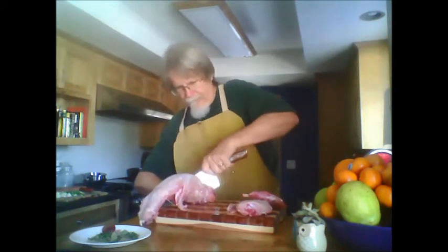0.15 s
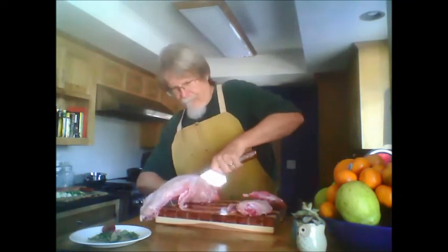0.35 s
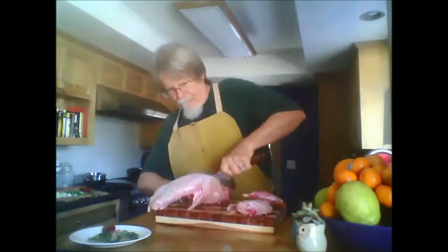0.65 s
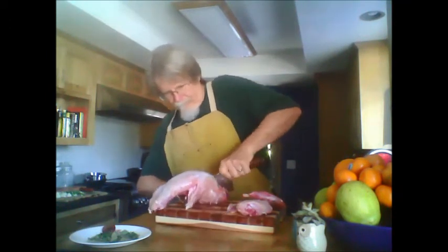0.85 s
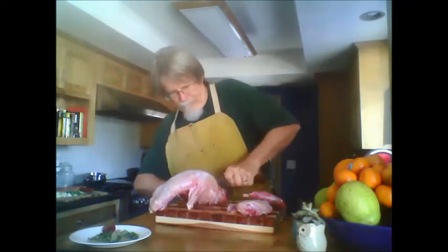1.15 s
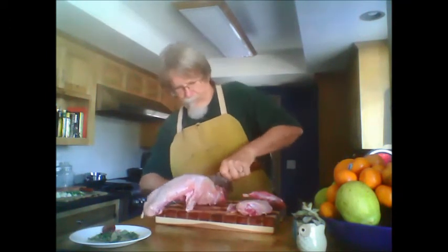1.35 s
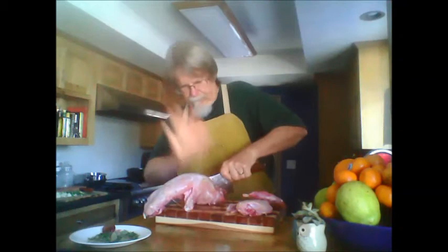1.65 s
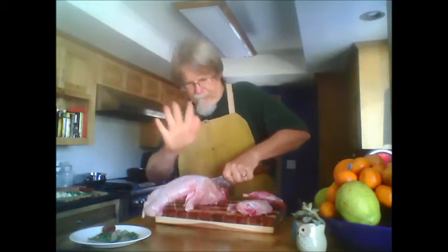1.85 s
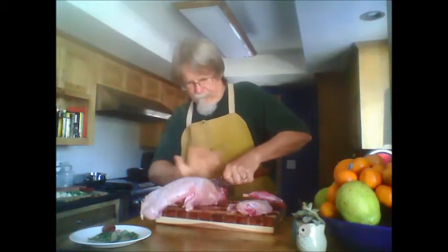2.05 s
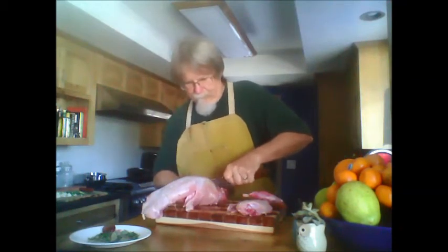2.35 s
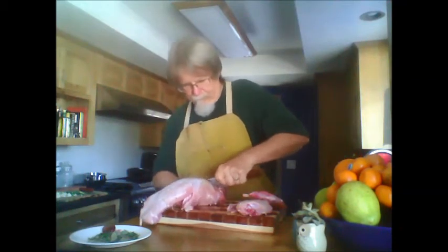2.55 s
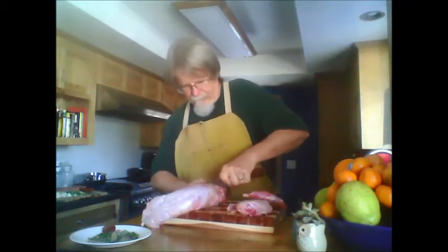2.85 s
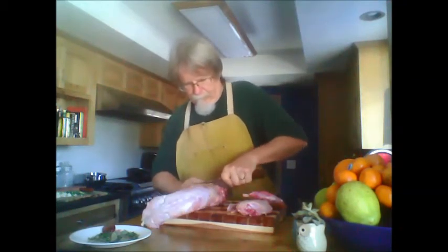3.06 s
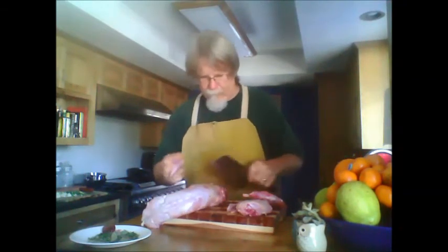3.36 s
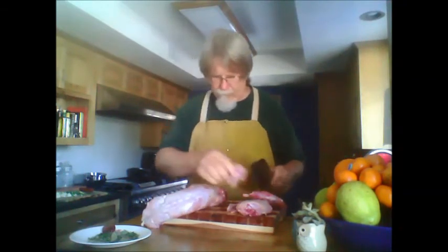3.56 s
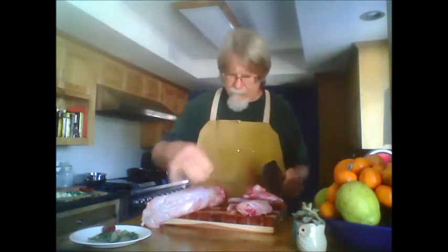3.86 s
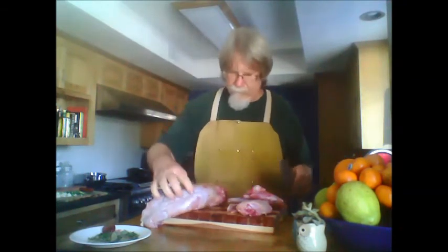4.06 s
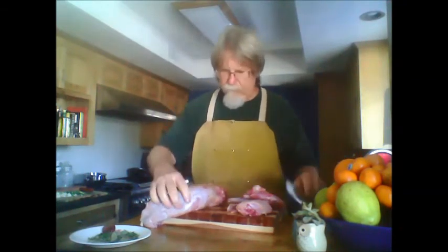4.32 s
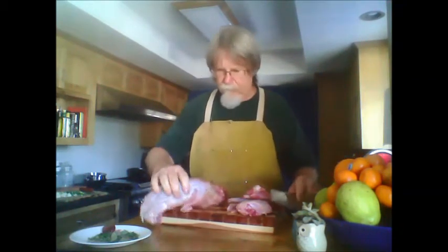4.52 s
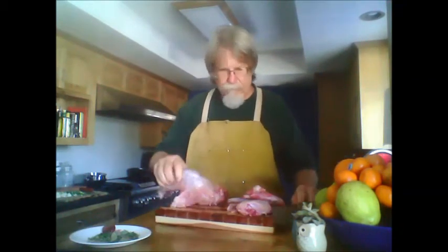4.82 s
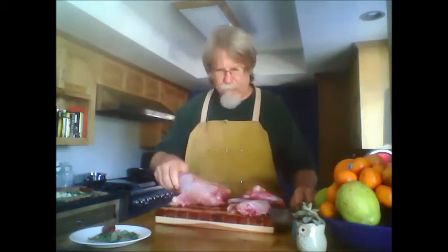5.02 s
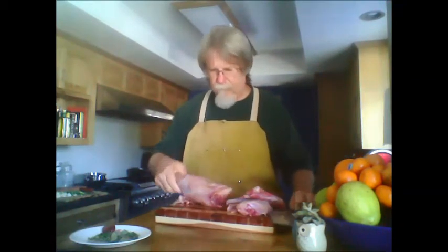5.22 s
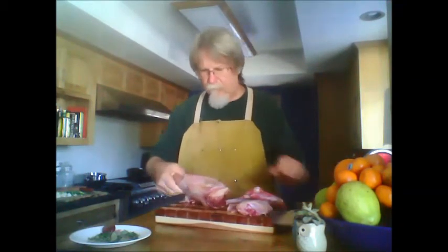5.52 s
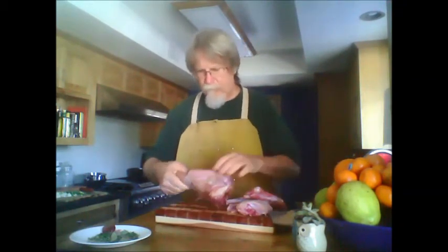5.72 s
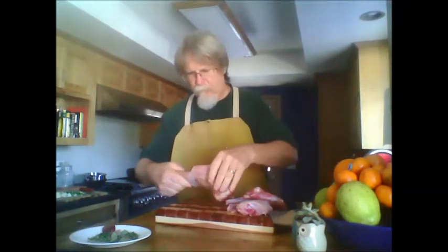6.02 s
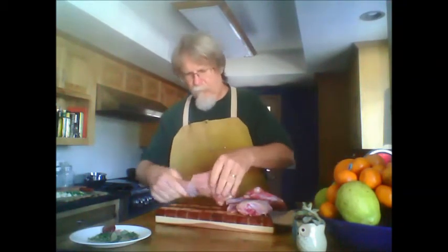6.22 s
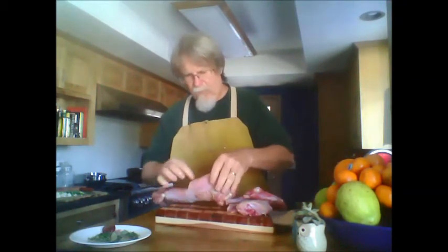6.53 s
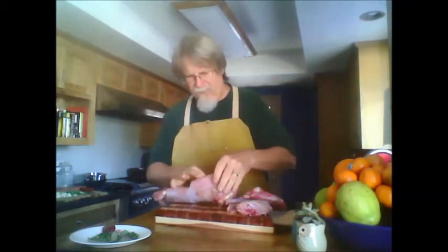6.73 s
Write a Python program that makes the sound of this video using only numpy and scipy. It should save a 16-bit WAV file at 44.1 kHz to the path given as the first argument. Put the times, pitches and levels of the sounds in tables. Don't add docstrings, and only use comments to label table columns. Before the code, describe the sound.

Close stereo microphones on a kitchen table pick up dull meaty thuds, small bony cracks and low palm thumps, then two strong wooden chops that set glazed dishes ringing. Short gritty drags and lighter chops come next. After a pause, a blade taps, the knife knocks loudly on the counter with a thin steel ring, bounces and settles. Short lively room echo, steady fridge hum.

```python
import sys
import numpy as np
from scipy import signal
from scipy.fft import rfft, irfft
from scipy.io import wavfile
from scipy.ndimage import uniform_filter1d

SR = 44100
rng = np.random.default_rng(int(sys.argv[2]) if len(sys.argv) > 2 else 0)


def volts(x):
    e = np.asarray(x, float) / 20
    return 10 ** e


def generate_wav(sig):
    pcm = np.round(np.clip(np.atleast_2d(sig).T, -1, 1) * 32767).astype(np.int16)
    wavfile.write(sys.argv[1], SR, pcm)


N = 303496


def evened(x):
    return x / np.sqrt(np.mean(x ** 2) + 1e-20)


def read(points, hz):
    f, value = np.transpose(points)
    return np.interp(np.log(hz + 1), np.log(f + 1), value)


def add(mix, start_s, sound):
    part = mix[round(start_s * SR):][:len(sound)]
    part += sound[:len(part)]


def causal(gain_db):
    logs = np.log(volts(np.maximum(gain_db, -100)))
    circle = np.concatenate([logs, logs[-2:0:-1]])
    return np.fft.ifft(np.exp(np.conj(signal.hilbert(circle)))).real[:len(logs)]


def peaks_db(peaks, hz, valley_db):
    power = sum(volts(2 * db) / (1 + (2 * (hz - f) / width) ** 2) for f, width, db in peaks)
    return 10 * np.log10(power + volts(2 * valley_db))


def pair(colour_db, same, size, patchy_db):
    frames, hz = 4 * N // size + 5, np.fft.rfftfreq(size, 1 / SR)
    a, b, c, d, patches = rng.standard_normal((frames, len(hz), 5)).T
    patches = uniform_filter1d(patches, size=9, axis=0)
    patches = evened(uniform_filter1d(patches, size=9, axis=1))
    like = np.clip(read(same, hz), 0, 1)[:, None]
    left = a + 1j * b
    right = like * left + np.sqrt(1 - like ** 2) * (c + 1j * d)
    patches /= 1 + (hz[:, None] / 1500) ** 2
    z = np.array([left, right]) * volts(colour_db(hz)[:, None] + patchy_db * patches)
    return evened(signal.istft(z, nperseg=size, noverlap=3 * size // 4)[1][:, :N])


def strokes(rows, rise_s, fall_db_per_s):
    t, power = np.arange(N) / SR, np.zeros(N)
    for start_s, db, *hold_s in rows:
        after = np.maximum(t - start_s - rise_s - sum(hold_s), 0)
        rise = np.clip((t - start_s) / rise_s, 0, 1)
        power += (rise * volts(db - fall_db_per_s * after)) ** 2
    return np.sqrt(power)


def rings(table, modes, rise_s):
    out, t = np.zeros(N), np.arange(SR) / SR
    for start_s, db, *tilt_db in table:
        sound = 0
        for hz, level_db, t60_s in modes:
            mode_db = level_db + sum(tilt_db) * np.log2(hz / 3000)
            sound = sound + volts(mode_db - 60 * t / t60_s) * np.sin(2 * np.pi * hz * t)
        add(out, start_s, volts(db) * sound * (1 - np.exp(-t / rise_s)) / abs(sound).max())
    return out


# pitch_hz, width_hz, level_db
MEAT_DROP = [(192, 24, -15), (460, 24, 3), (850, 53, -2), (1060, 46, -0.5), (1554, 25, -5),
             (2520, 110, -41)]
JOINT = [(339, 48, 19), (566, 54, 9), (1085, 70, 7.5), (2370, 210, 1), (3260, 300, 0), (4370, 330, 0.5),
         (6020, 170, -3)]
BONE = [(197, 18, 19), (910, 32, -4), (1420, 35, -27), (2400, 170, -13), (3300, 160, -10), (3550, 140, -6)]
BOARD_TAP = [(555, 120, -2), (1100, 70, 5), (1440, 150, -5), (2400, 200, -4), (3200, 400, -10)]
BOARD = [(182, 110, 8), (720, 230, -6), (1660, 45, -3.5), (2302, 46, -1.5), (3380, 110, -8.5),
         (5600, 35, -25), (6276, 540, -15), (7700, 34, -35)]
BOARD_AGAIN = [(502, 80, 1), (935, 170, -0.5), (1646, 180, 1.5), (2380, 110, 4.5), (3050, 200, -1),
               (4260, 49, -26), (4800, 33, -36), (6670, 220, -14.5)]
BOARD_THROUGH = [(640, 98, -2.5), (1720, 97, -4), (3330, 170, -7), (3970, 267, -10), (5700, 81, -19.5),
                 (6300, 160, -17.5)]
BLADE_TAP = [(526, 51, 19), (1135, 51, 10.5), (1706, 120, 4.5), (2260, 46, -11), (2460, 44, -6),
             (3030, 160, -21.5), (3140, 96, -6), (3900, 200, -4)]
FINGER_TICK = [(1204, 170, 1), (1660, 200, 1), (2250, 300, -2.5)]
COUNTER = [(560, 150, -3), (740, 90, -3), (912, 80, 1), (1650, 200, -5), (2100, 200, -11), (2750, 400, -11),
           (3770, 100, -21), (5920, 60, -24), (6600, 400, -22)]
COUNTER_BOUNCE = [(1559, 98, -1.5), (2104, 36, -4), (2310, 90, -3.5), (2910, 140, -6), (3584, 34, -9),
                  (4700, 67, -21.5), (6220, 100, -18), (6610, 150, -17.5), (8650, 96, -24.5)]
HANDLE = [(310, 51, -2), (613, 76, 1.5), (695, 65, -9.5), (983, 52, 0), (1526, 33, -2.5), (1836, 52, -5.5),
          (2554, 88, -0.5), (3100, 120, -2.5), (3690, 240, -9.5), (4100, 530, -16.5)]
STRUCK = [MEAT_DROP, JOINT, BONE, BOARD_TAP, BOARD, BOARD_AGAIN, BOARD_THROUGH, BLADE_TAP, FINGER_TICK,
          COUNTER, COUNTER_BOUNCE, HANDLE]
STRUCK_FROM = [0, .3, .66, 1.1, 1.6, 1.9, 2.4, 3.5, 3.9, 4.3, 4.8, 5.1]
BANDS_HZ = [80, 300, 1300, 4000, 14000]


def blows(table, broad, valley_db):
    hz, t, paths = np.fft.rfftfreq(8192, 1 / SR), np.arange(2048) / SR, np.zeros((3, N))
    draws = rng.standard_normal((len(table), 2, len(t)))
    band = np.digitize(hz, BANDS_HZ)
    middles = np.sqrt(np.multiply(BANDS_HZ[1:], BANDS_HZ[:-1]))
    for k, (start_s, db, snap_db, edge_db, contact_s) in enumerate(table):
        modes = STRUCK[np.searchsorted(STRUCK_FROM, start_s) - 1]
        body = [(f, max(width, 55), top) for f, width, top in modes]
        flurry = draws[k, 0] * (abs(draws[k, 1]) > 1.5) * np.exp(-t / np.clip(contact_s, .0025, .04))
        flurry[0] = 0.94
        flurry_power = abs(rfft(flurry, n=8192)) ** 2
        colour_db = peaks_db(body, hz, read(broad, hz) + valley_db)
        colour_db -= 10 * np.log10(1 + (110 / (hz + 1)) ** 6)
        colour_db -= 0.69 * 10 * np.log10(uniform_filter1d(flurry_power, size=25))
        found_db = 10 * np.log10(np.bincount(band, flurry_power * volts(2 * colour_db))[1:5])
        thud_db = -15 + 0.2 * db
        wanted_db = db + np.array([thud_db, 0, snap_db + 2.5, edge_db + 4.5]) + 16.5
        colour_db += read(np.transpose([middles, wanted_db - found_db]), hz) + 10 * np.log10(len(hz))
        add(paths[k % 3], start_s, signal.fftconvolve(flurry, causal(colour_db)))
    return paths


# start_s, peak_db, snap_db, edge_db, contact_s
CHOPS = [(0.065, -20, -18.5, -58, 0.022), (0.381, -28, -12, -18, 0.008), (0.429, -41, -23, -34, 0.0075),
         (0.523, -29, -27, -13, 0.017), (0.544, -45.5, 8, 0, 0.005), (0.687, -26, -4, -48, 0.0022),
         (0.747, -20, -5.5, -24.5, 0.005), (1.209, -46.5, 5.5, -9.5, 0.0021),
         (1.33, -27.5, -3, -43, 0.0038), (1.7067, -7.5, -14.5, -21.5, 0.0022),
         (1.9985, -22.5, -1, -14.5, 0.0075), (2.0055, -13.5, -9, -16, 0.0046),
         (2.101, -31.5, 6.5, -15, 0.01), (2.233, -44.5, 6, -0.5, 0.0059), (2.37, -46.5, -6, -29, 0.0038),
         (2.459, -35, -16, -14.5, 0.0079), (2.633, -22, -2, -13, 0.0076), (2.644, -30.5, -3, -1, 0.0037),
         (2.732, -28, -24, -27, 0.004), (2.904, -32.5, -17, -52, 0.007)]
# start_s, peak_db, snap_db, edge_db, contact_s
BITES = [
    (0.738, -50, 5, -1, 0.0023),
    (1.7, -17, -2, -13, 0.0091),
    (1.7091, -12.5, 0, -15.5, 0.0022),
    (1.7134, -20, -32, -9, 0.005),
    (2.629, -33, -6, 0.5, 0.0021),
    (2.892, -40, -11, -19, .002),
]
# pitch_hz, density_db
BLOW_COLOUR = [(59, -50), (100, 4), (201, -1), (281, -6), (655, -6), (1620, -13), (2010, -16), (2430, -9),
               (4290, -21), (6410, -25.5), (9500, -42.5), (15600, -45)]


def chops():
    return blows(CHOPS + BITES, BLOW_COLOUR, 0)


# start_s, peak_db, snap_db, edge_db, contact_s
KNOCKS = [
    (3.658, -28.5, 11, -22, 0.0046),
    (3.976, -46, 0, -29.5, 0.0023),
    (4.341, 0.5, -2, -28, 0.0036),
    (4.682, -55, 0, -10, 0.0051),
    (4.846, -24, -1, -9, 0.014),
    (4.8755, -13, -0.5, -13, 0.0039),
    (5.138, -10, -4.5, -37.5, 0.0097),
    (5.778, -45.5, -2.5, -46, 0.0041),
]
# start_s, peak_db, snap_db, edge_db, contact_s
BOUNCES = [
    (4.347, -17.5, 1, -28.5, 0.0022),
    (4.572, -70, 1.5, 11.5, 0.0011),
    (5.133, -19, -14.5, -33.5, 0.0056),
]
# pitch_hz, density_db
KNOCK_COLOUR = [(59, -43.5), (100, -20.5), (181, -0.5), (412, -8.5), (899, -7), (1400, -11.5), (2810, -13),
                (4200, -22.5), (6680, -25.5), (7120, -45), (15600, -61.5)]


def knocks():
    return blows(KNOCKS + BOUNCES, KNOCK_COLOUR, -1.3)


# pitch_hz, level_db, t60_s
BLADE = [(5911, -7, .5), (5935, -13, .3), (6562, -9, .3), (7494, -12, .25), (8904, -10, .22),
         (9345, -15, .22), (11870, -16, .15), (13430, -4, .17)]
# start_s, peak_db
BLADE_HITS = [
    (4.341, -32.5),
    (4.846, -40.5),
    (4.875, -47),
    (5.139, -61),
]


def blade():
    return rings(BLADE_HITS, BLADE, 0.00078)


# start_s, level_db, hold_s
SLIDES = [
    (0.0, -52.5, 0.005),
    (.337, -53.5, .035),
    (.376, -44.5, 0.002),
    (.44, -51, 0.091),
    (.528, -45.5, 0.022),
    (2.457, -47, 0.063),
]
# pitch_hz, density_db
DRAG_COLOUR = [(180, -43), (300, -6.5), (571, -8), (692, -1), (840, -14), (1880, -10), (2390, -8),
               (3090, -9.5), (4840, -20), (6470, -21.5), (14000, -40)]
# start_s, level_db, hold_s
GRAIN_DRAGS = [
    (2.65, -43.5, 0.048),
    (2.72, -51.5, .03),
    (2.765, -41, 0.062),
    (2.9, -48, 0.058),
]
# pitch_hz, density_db
GRAIN_COLOUR = [(120, -21), (200, -16), (312, -21), (400, -4), (504, -6), (719, -11.5), (1180, -9.5),
                (1320, -13), (1660, -11.5), (2130, -17.5), (3690, -23), (4180, -29), (14000, -46)]
# pitch_hz, width_hz, level_db
GRISTLE = [(1620, 64, -4), (2190, 26, -2), (2430, 50, 0), (3000, 48, -1), (3360, 34, -3), (3680, 56, -5)]
# start_s, level_db, hold_s
SQUEAKS = [
    (.17, -66, .14),
    (2.459, -48.5, 0.0069),
    (2.49, -51, 0.037),
    (2.226, -50.5, .002),
    (4.037, -58.5, 0.0036),
    (5.6, -66.5, 0.021),
    (5.684, -63.5, .006),
    (6.066, -63, .045),
]


def drags():
    slip_db = 4.2 * np.minimum(rng.exponential(1, N), 3)
    slips = rng.standard_normal(N) * volts(slip_db) * (rng.random(N) < 4000 / SR)
    hz, out = np.fft.rfftfreq(4096, 1 / SR), np.zeros(N)
    for rows, colour in [(SLIDES, DRAG_COLOUR), (GRAIN_DRAGS, GRAIN_COLOUR)]:
        sound = evened(signal.oaconvolve(slips, causal(read(colour, hz)))[:N])
        out += sound * strokes(rows, rise_s=0.0038, fall_db_per_s=304)
    valley_db = read([(500, -40), (1800, -12), (4000, -14), (9000, -30)], hz)
    squeak_db = peaks_db([(f, 3 * width, db) for f, width, db in GRISTLE], hz, valley_db)
    squeak = evened(signal.oaconvolve(slips[::-1], causal(squeak_db))[:N])
    return out * volts(-4.5) + squeak * strokes(SQUEAKS, rise_s=.0015, fall_db_per_s=500)


# start_s, peak_db, pitch_hz, t60_s
TICKS = [(0.7493, -28.5, 2440, .05), (.7485, -31, 884, 0.072), (0.6873, -28, 1850, 0.018),
         (.687, -38, 3150, 0.014), (.692, -37, 2500, .02), (.7475, -27, 3300, 0.017),
         (5.779, -47, 250, .04), (.842, -43, 850, .06), (.315, -51, 1080, 0.11), (0.387, -36.5, 3130, .015),
         (.39, -44, 4550, .02), (0.448, -42, 3300, .012), (.477, -38, 3230, .02), (.528, -39.5, 3250, .03),
         (.54, -41.5, 2350, 0.044), (.524, -32.5, 527, 0.12), (.624, -50, 1500, .008),
         (2.063, -28, 3360, 0.013), (2.104, -31, 2120, 0.047), (2.731, -30, 195, 0.098),
         (2.7656, -44, 1620, .015), (2.7843, -36, 1610, 0.049), (2.81, -34, 1630, 0.027),
         (2.838, -34, 1660, 0.023), (2.903, -27.5, 226, 0.025), (3.974, -45.5, 1176, .03),
         (3.977, -42, 1700, 0.049), (5.779, -44, 1720, 0.031), (5.778, -46, 2300, 0.016)]
# start_s, peak_db, pitch_hz, t60_s
SNAPS = [(.309, -52, 3200, .006), (.336, -41, 3300, .004), (.488, -34, 3600, .002),
         (2.891, -36, 3450, .008), (3.976, -47, 2900, .004), (4.038, -40, 2200, .002),
         (4.046, -49, 2100, .004), (5.621, -50, 2600, .008), (4.682, -44, 4200, .002),
         (4.572, -50, 13500, .002)]
# start_s, peak_db, pitch_hz, t60_s
WOOD_NOTES = [(.384, -32, 336, 0.1), (1.332, -44, 1083, 0.36), (1.332, -45, 1177, .35),
              (1.331, -38, 2400, 0.054), (1.331, -38.5, 567, 0.1), (3.659, -28, 575, .06),
              (3.659, -29, 1765, 0.076), (3.66, -39, 1195, 0.35), (3.66, -43.5, 1074, 0.44),
              (3.66, -48, 1695, .45), (4.341, -12, 1660, 0.065), (4.342, -18, 916, 0.36),
              (4.343, -20, 858, 0.3), (4.344, -21.5, 1188, .3), (4.342, -17, 735, .25),
              (4.342, -17, 602, 0.27), (4.345, -29, 1660, .3), (4.846, -30, 1580, 0.054),
              (4.85, -37, 3470, .15), (4.8755, -13, 2530, .025), (4.878, -26, 1526, .15),
              (4.88, -25, 732, 0.069), (5.139, -23.5, 942, .25), (5.139, -31, 1184, .25),
              (1.7098, -16, 995, 0.067), (1.713, -23, 873, 0.16), (1.708, -20, 660, 0.18)]
# start_s, peak_db, pitch_hz, t60_s
GLASS_NOTES = [(2.062, -33, 3009, .12), (2.09, -27, 3009, .26), (2.064, -25, 3042, .33),
               (2.06, -50, 4692, .3), (2.12, -55, 4692, .3), (2.095, -56, 5809, .9), (2.07, -52, 6831, .25),
               (2.891, -44, 3009, .15), (2.917, -41, 3009, .3), (2.891, -48, 3042, .12),
               (2.93, -44, 3042, .2), (2.99, -50, 3042, .3), (3.04, -52, 3042, .3), (3.068, -52, 3042, .26)]


def ticks():
    out, t = np.zeros(N), np.arange(SR // 2) / SR
    for start_s, db, hz, t60_s in TICKS + SNAPS + WOOD_NOTES + GLASS_NOTES:
        swell = np.minimum(t * hz, 1)
        ring = volts(-60 * t / max(t60_s, .002)) * np.sin(2 * np.pi * hz * t) * swell
        add(out, start_s, volts(db) * ring / abs(ring).max())
    return out


# pitch_hz, level_db, t60_s
CROCKERY = [(3009, 0, .32), (3042, -1, .3), (4692, -27, .3), (5809, -28, .6), (6831, -33, .2)]
# start_s, peak_db, brightness_db an octave
CLINKS = [
    (1.78, -30, 2),
]
# pitch_hz, level_db, t60_s
CUP = [(4689, -6, .45), (5809, 0, .55), (5780, -9, .3), (6831, -6, .25), (2336, -8, 1.2)]
# start_s, peak_db
CUP_TOUCHES = [
    (2.8925, -53),
    (2.9125, -50),
]
# pitch_hz, level_db, t60_s
BOWL = [(1510, -5, 0.22), (2085, 5, 0.17), (2342, -8, 1.5), (3741, -5, .25)]
# start_s, peak_db
BOWL_CLINKS = [
    (1.72, -52),
    (2.10, -31.5),
]


def crockery():
    plates = rings(CLINKS, CROCKERY, 0.0055)
    return plates + rings(CUP_TOUCHES, CUP, 0.0026) + rings(BOWL_CLINKS, BOWL, 0.0022)


# pitch_hz, width_hz, level_db
TABLE = [(77.05, 9.6, -2), (104, 25, -3), (145.4, 28, -3.5), (199.6, 35, -2), (304, 78, -6.5)]
# start_s, level_db
PUSHES = [(.07, -33), (.38, -39.5), (.51, -43), (.73, -38.5), (1.03, -46.5), (1.7, -22), (2.01, -24.5),
          (2.46, -41), (2.63, -37.5), (2.73, -34), (2.89, -30), (2.94, -57), (3.06, -62), (3.17, -73),
          (3.65, -44), (4.02, -52), (4.335, -29.5), (4.5, -42), (4.69, -47), (4.845, -30), (5.12, -42),
          (5.19, -45)]
# pitch_hz, level_db, t60_s
TABLE_MODES = [(74, -12, 0.2), (102.8, 20, 0.41), (138, -7, 0.18), (200, -56, 0.14)]
# start_s, peak_db
THUMPS = [
    (0.071, -23),
    (0.744, -50),
    (1.055, -27.5),
    (1.154, -33.5),
    (1.702, -22),
    (2.033, -13),
    (2.088, -20),
    (2.73, -42),
    (2.9, -29),
    (2.945, -23),
]
# pitch_hz, density_db
ROCKING_COLOUR = [(8, -19.5), (18, -3), (30, -0.5), (45, -7.5), (65, -5.5), (100, -68.5)]
# start_s, level_db, hold_s
LEANS = [
    (.95, -51.5, 0.38),
    (1.68, -38.5, 0.12),
    (1.97, -45.5, 0.41),
    (2.72, -38, 0.15),
    (3.05, -44.5, 0.16),
    (3.63, -55.5, 0.085),
]


def rocking():
    same = [(20, 1.0), (400, 0.995)]  # pitch_hz, left-right likeness
    boom = pair(lambda hz: 2 * peaks_db(TABLE, hz, -66.0), same, size=4096, patchy_db=1.5)
    boom *= volts(-2.0) * strokes(PUSHES, rise_s=.04, fall_db_per_s=129)
    thump = volts(-10.5) * rings(THUMPS, TABLE_MODES, 0.0041)
    sway = pair(lambda hz: read(ROCKING_COLOUR, hz), same, size=8192, patchy_db=6.5)
    sway *= volts(-59.5) + strokes(LEANS, rise_s=0.06, fall_db_per_s=54)
    return boom + thump + sway


# pitch_hz, t60_s
KITCHEN = [(100, 0.41), (260, 0.39), (700, 0.4), (1840, 0.42), (4850, 0.46), (8000, 0.3), (14000, 0.17)]
# pitch_hz, left-right likeness
KITCHEN_SAME = [(60, .995), (150, .997), (380, 0.98), (950, 0.9), (2380, 0.55), (4500, 0), (8000, .35),
                (15000, .2)]


def kitchen(paths, wet_db, gap_s):
    count = SR // 40
    taps, t = np.zeros((len(paths), 2, 20 * count)), np.arange(20 * count) / SR
    at = 20 * np.arange(count) + rng.integers(0, 20, (len(paths), 2, count))
    np.put_along_axis(taps, at, rng.choice([-1., 1.], at.shape), 2)
    taps *= 1 - np.exp(-(t / gap_s) ** 2)
    taps *= 1 + 1.88 * np.exp(-t / 0.0046)
    hz, frame_s, z = signal.stft(taps, SR, nperseg=512)
    like = np.clip(read(KITCHEN_SAME, hz), 0, 1)[:, None]
    z[:, 1] = like * z[:, 0] + np.sqrt(1 - like ** 2) * z[:, 1]
    decay = volts(-60 * frame_s / read(KITCHEN, hz)[:, None])
    tails = signal.istft(z * decay, SR, nperseg=512)[1]
    tails /= np.linalg.norm(tails, axis=2, keepdims=True)
    return volts(wet_db) * signal.fftconvolve(paths[:, None], tails, axes=2).sum(0)[:, :N]


# pitch_hz, density_db
HUM = [(24, -33.5), (40, -2.5), (129, -15), (218, -19), (342, -18.5), (397, -18.5), (592, -22), (861, -24),
       (1000, -24), (1280, -24), (1820, -27.5), (2060, -26.5), (4360, -33), (5730, -33.5), (15600, -36.5)]
# pitch_hz, width_hz, level_db
HUM_BANDS = [(217, 20, 5), (867, 32, -11.5), (1260, 30, -0.5), (5808, 33, -3)]
# pitch_hz, left-right likeness
HUM_SAME = [(60, 0.47), (150, 0.35), (380, 0.23), (950, 0.73), (2380, 0.37), (4400, 0.0092), (15000, 0.01)]


def hum():
    def colour_db(hz):
        return read(HUM, hz) + peaks_db(HUM_BANDS, hz, -6.5)
    return volts(-53.5) * pair(colour_db, HUM_SAME, size=2048, patchy_db=2.5)


def scene():
    paths = chops() + knocks()
    paths[1] += drags() + blade()
    clinks, small = crockery(), ticks()
    direct = paths.sum(0) + clinks + small
    lag_s = .000026
    turn = np.exp(-1j * 2 * np.pi * np.fft.rfftfreq(N, 1 / SR) * lag_s)
    late = irfft(rfft(direct) * turn, N)
    paths[2] += 0.16 * small
    paths[0] += .14 * clinks
    return np.array([late, direct]) + kitchen(paths, wet_db=2.5, gap_s=0.00037) + rocking() + hum()


def top_cut(x):
    return signal.sosfilt(signal.butter(12, 15700, fs=SR, output="sos"), x)


def record(dry):
    over = np.maximum(abs(dry) - .6, 0)
    held = np.sign(dry) * (abs(dry) - over + .38 * np.tanh(over / .38))
    held = signal.oaconvolve(held, signal.firwin(301, 15750, fs=SR)[None], "same")
    return top_cut(held)


dry = scene()
out = record(dry)
generate_wav(out)
```